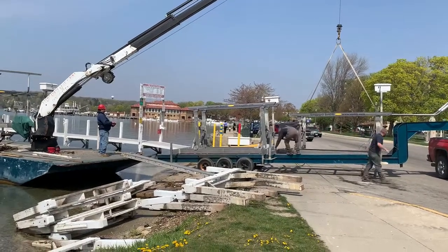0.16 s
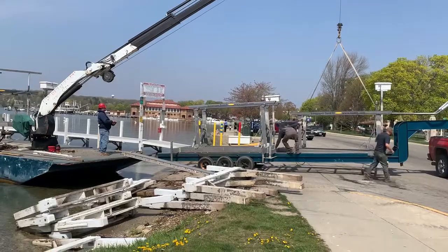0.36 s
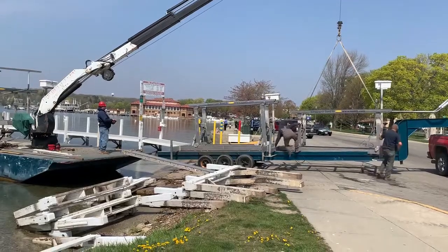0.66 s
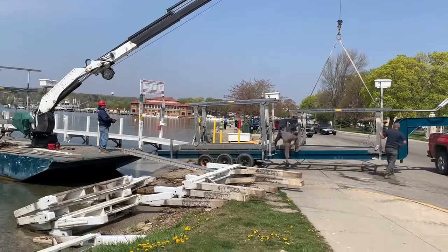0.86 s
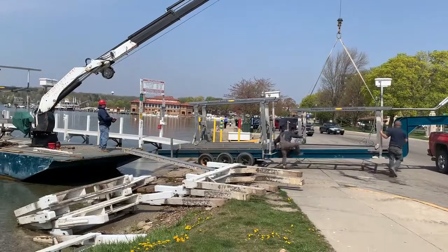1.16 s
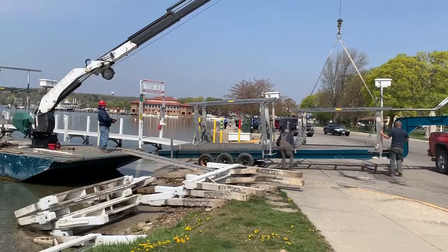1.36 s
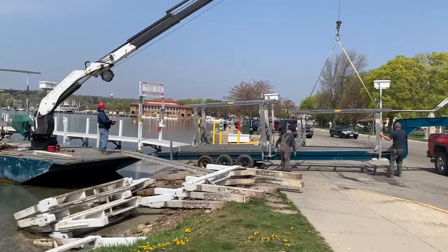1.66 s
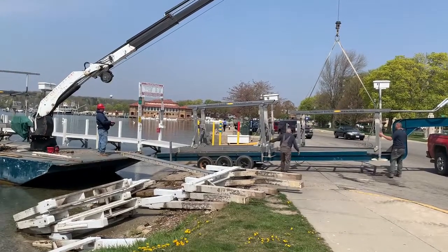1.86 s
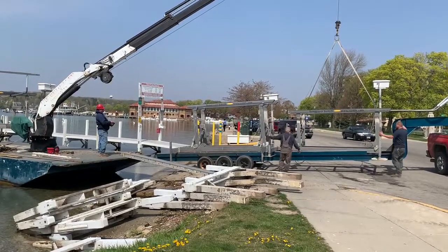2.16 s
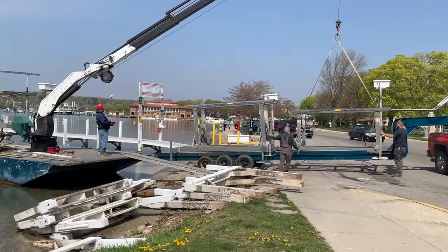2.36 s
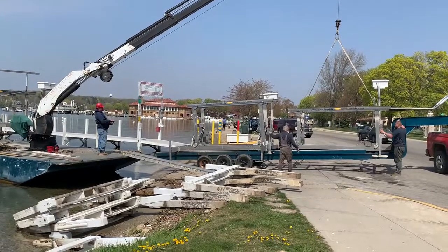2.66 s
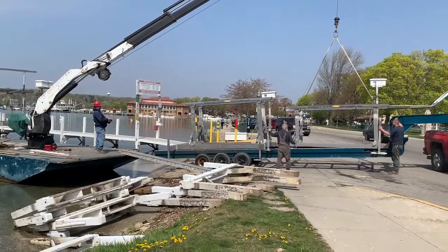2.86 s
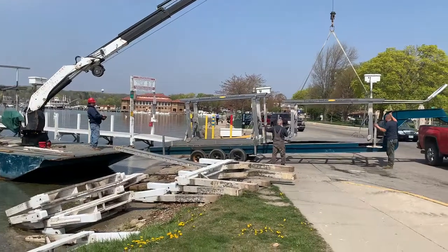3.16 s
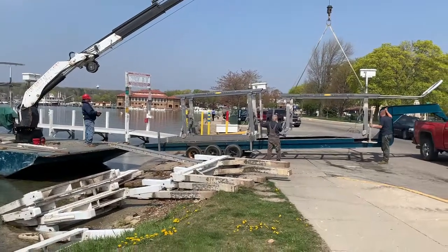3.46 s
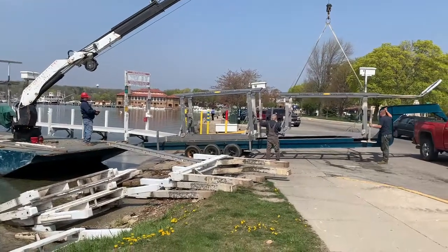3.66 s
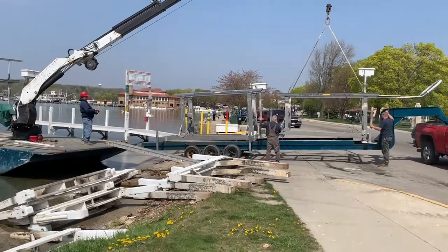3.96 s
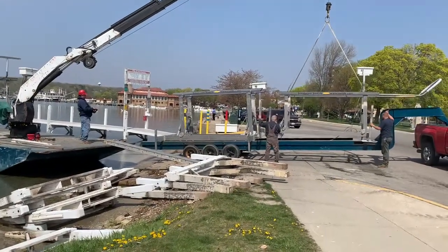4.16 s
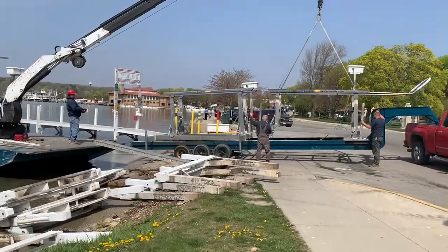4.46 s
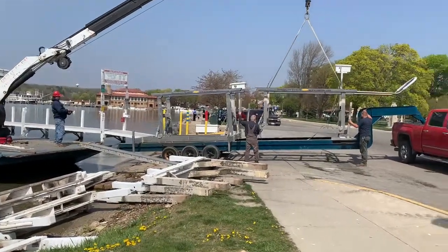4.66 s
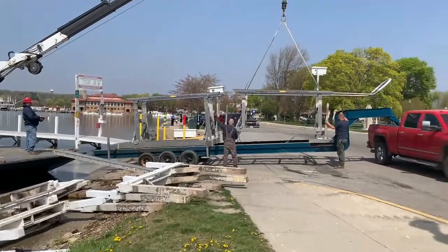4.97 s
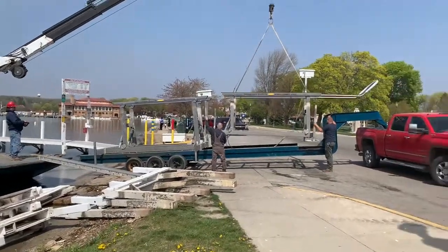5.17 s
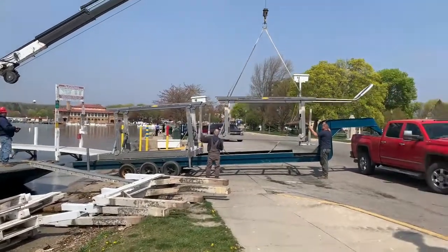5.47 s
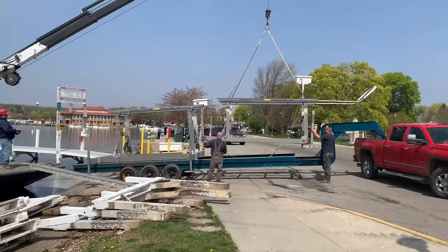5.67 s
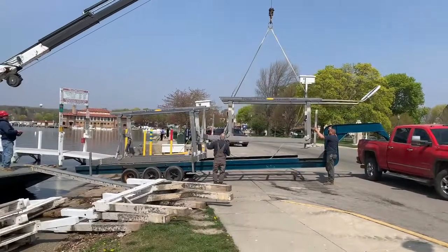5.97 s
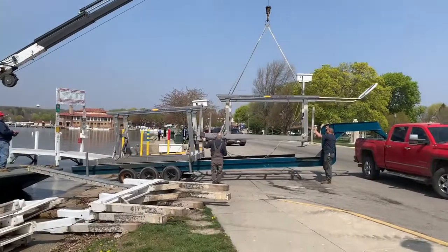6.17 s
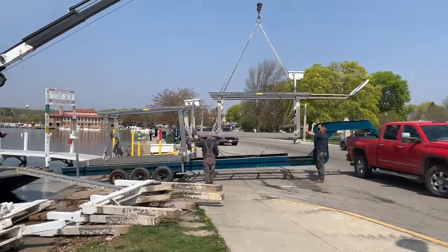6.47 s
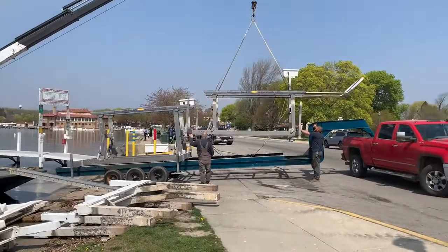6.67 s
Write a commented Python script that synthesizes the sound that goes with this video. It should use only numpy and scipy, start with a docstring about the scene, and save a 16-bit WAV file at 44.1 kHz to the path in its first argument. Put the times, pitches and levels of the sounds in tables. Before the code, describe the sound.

A continuous mechanical hum, throbbing roar and steady pitched pump whine fill an open lakeside ramp, with another engine idling softly behind. Small scuffs give way to a metal frame clunking and rattling, then isolated light clinks. Toward the end low rolling noise and soft thumps swell, a brief hiss passes, and gusts buffet the stereo microphone over a faint rustle.

```python
"""Barge crane at a lakefront

A crane lifts a metal frame: its diesel drones from the left and drives a piston pump that whines with the load,
both as sums of harmonics over a throbbing noise; a second engine idles nearby as wavering hum lines.
The frame clinks as summed modes and clunks as noise bursts; boot scuffs and a late rustle are noise bursts.
A pickup draws near on the right as rising bands of noise with ringing thumps, amid a swell of air hiss.
Late on the microphone turns away from the crane and wind buffets it with gusts of low noise and thuds."""
import sys
import numpy as np
from scipy import signal
from scipy.fft import rfft, irfft, next_fast_len
from scipy.io import wavfile

SR = 44100
rng = np.random.default_rng(int(sys.argv[2]) if len(sys.argv) > 2 else 0)


def wav_out(sig):
    """Save sig, one row per channel (or a flat mono array), as 16-bit PCM at SR to the path in sys.argv[1]."""
    wavfile.write(sys.argv[1], SR, np.round(np.clip(np.atleast_2d(sig).T, -1, 1) * 32767).astype(np.int16))


N = 301203
SIDES = np.array([[.5], [-.5]])   # shares a left-right difference between left and right

# Columns named pan_db give left minus right; lead_rad is the phase by which left leads.
# Piston rate of the pump, sagging under load: start_s, rate_hz
PISTON_RATE = [(0, 265.3), (.3, 266), (.7, 264.8), (.9, 266.2), (1.3, 267), (1.7, 265.7), (2.1, 264.2),
               (2.4, 263.9), (3.7, 265), (4.3, 264.2), (4.9, 264.8), (6.83, 264.8)]
# Engine orders: multiple_of_shaft_rate, mean_rms_db
ENGINE_ORDERS = [(3, -59.5), (5, -51), (6, -46.5), (7, -46), (8, -45.5), (9, -53.5), (11, -49.5),
                 (12, -52.5), (13, -49.5), (15, -54), (16, -49.5), (17, -61.5), (18, -56), (20, -59),
                 (29, -57.5)]
# Levels of the two lowest tones, with a short wind thud in the hum near 6.5 s:
# start_s, low_hum_rms_db, first_pump_harmonic_rms_db
LOW_TONE_LEVELS = [(0, -37, -39), (.2, -27, -45), (.55, -35, -52), (.75, -36, -37.5), (.9, -31, -40),
                   (1.25, -30.5, -40.5), (1.6, -30.5, -54), (2.0, -32, -48), (2.2, -34.5, -36.5),
                   (3.3, -31, -37), (3.6, -31.5, -49.5), (4.3, -35, -37), (5.1, -36, -38.5),
                   (5.7, -33.5, -36.5), (6.05, -39, -30.5), (6.3, -36, -43), (6.52, -19.5, -30),
                   (6.65, -34, -29.5), (6.83, -33, -32)]
# Whine swelling with the load: start_s, second_harmonic_rms_db, third_harmonic_rms_db
WHINE_LEVELS = [(0.0, -51, -56), (0.04, -37, -60), (0.05, -35.5, -49.5), (0.44, -37.5, -47),
                (0.55, -37, -41), (0.86, -35, -40), (0.91, -41, -42), (1.0, -46, -53), (1.05, -38, -51),
                (1.12, -41.5, -51), (1.2, -41, -50.5), (1.41, -39, -51), (1.81, -36, -47),
                (2.04, -33.5, -34.5), (2.2, -31, -36.5), (3.19, -31.5, -38), (3.25, -28, -40),
                (3.31, -32, -39), (3.65, -33.5, -36), (4.19, -32.5, -36.5), (4.7, -32.5, -40),
                (5.04, -29.5, -34), (5.14, -31, -37), (5.4, -33, -34), (5.46, -32.5, -33.5),
                (5.85, -37.5, -35), (6.1, -32.5, -35), (6.5, -31.5, -34), (6.83, -36.5, -34)]
# Place of the first pump harmonic: pan_db, lead_rad
FIRST_HARMONIC_PLACE = (-1.3, 0.17)
# Wandering place of the whine: start_s, second_pan_db, second_lead_rad, third_pan_db, third_lead_rad,
# upper_lead_rad
WHINE_PLACES = [(0, 3.4, 0.82, 5, 0.5, .8), (.4, 11.4, 0.69, 4, 0, 0.68), (.85, 6.6, 1.6, 0.5, 0, .8),
                (1.1, 3.2, .1, 11, -1, .8), (1.6, 7.2, 0.45, 10, 0.2, 0.66),
                (2.0, 5.1, 0.95, 2.5, -1.14, 0.87), (3.2, 4.8, 1.04, 0.5, 1, 0.75),
                (3.8, 4.3, 1.7, 1, 0.4, 2.3), (4.4, 4.7, 0.74, 1, 0.65, 1.5), (5.3, 4.4, 1.9, 2, 1.2, 3.9),
                (5.85, 13.5, 0.36, 5, 1.0, 4.1), (6.1, 5.5, 2.47, 1, 1.5, 4.5),
                (6.83, 4.7, 3.2, 3, 2.5, 2.6)]
# Flutter spread of pump harmonics 1 to 3: spread_db
PUMP_FLUTTER = [2, 0.64, 0.23]
# Upper pump harmonics: multiple_of_piston_rate, db_over_mean_of_harmonics_2_and_3
UPPER_HARMONICS = [(4, -15), (5, -16), (7, -23), (9, -28), (10, -23.5), (11, -25)]
# Hum lines of a second engine idling nearby: pitch_hz, mean_rms_db
IDLE_LINES = [(60.5, -48), (105.5, -44.5), (133, -46), (160, -42)]
# Crane roar: frequency_hz, relative_db_per_hz
ROAR_SPECTRUM = [(20, -41), (35, -24), (62, 2.5), (90, -9), (160, -6.5), (200, -11), (300, -16),
                 (450, -18.5), (900, -18.5), (1300, -18), (2100, -24), (2650, -24), (3200, -30),
                 (6700, -48), (8400, -69)]
# Likeness of the roar on both sides: frequency_hz, shared_power_share
ROAR_LIKENESS = [(60, 0.57), (300, 0.81), (1200, 0.43), (2700, 0.69), (5000, 0.34), (9000, 0.2)]
# Clinks of the frame: start_s, peak_db, contact_from_hz, contact_to_hz, share_of_free_ring_time
FRAME_CLINKS = [(3.214, -20.5, 600, 690, 1), (3.224, -20, 240, 310, .7), (3.232, -23, 770, 900, .6),
                (3.252, -26, 620, 780, 1), (3.288, -23, 240, 310, 1), (3.308, -21, 310, 370, 1),
                (3.236, -30, 2100, 2450, 1.2), (3.256, -30, 1550, 2050, 1), (3.276, -30, 1500, 1700, .8),
                (3.468, -25, 670, 780, .4), (3.857, -42, 6000, 12000, 1), (4.0055, -27, 1200, 1700, .45),
                (4.551, -31, 1600, 4000, 1), (4.9667, -31, 3950, 4650, .45), (4.967, -39, 6200, 13000, 1),
                (4.9675, -31, 3300, 3700, 1), (4.968, -32, 2500, 2750, .7), (4.969, -29, 1900, 2060, .5),
                (4.987, -33, 2200, 2400, .4), (4.989, -26, 1700, 1860, .8), (5.710, -38, 6000, 14000, 1),
                (6.1255, -31, 5200, 5700, .45), (6.125, -25, 1700, 2080, .7), (6.128, -30, 4150, 4450, 1.2),
                (6.130, -25, 2150, 2700, 1.5), (6.145, -34, 3800, 4800, .8), (6.152, -33, 1200, 1700, .8)]
# Modes of the free frame: pitch_hz, relative_db, free_t60_s
FRAME_MODES = [(280, 0, .15), (335, 0, .15), (655, 0, .2), (725, -2, .15), (820, -2, .15), (1300, -2, .05),
               (1450, -5, .05), (1620, -2, .05), (1780, -1, .06), (1980, 0, .05), (2300, 0, .05),
               (2620, -3, .03), (3500, -2, .025), (4100, -3, .025), (4300, -2, .035), (4600, -3, .025),
               (5450, -3, .03), (6400, -8, .02), (7300, -8, .02), (10800, -10, .02), (12300, -16, .015)]
# Clunk of the frame, then two as it rocks back: start_s, level_db, tilt_db_per_octave, pan_db
# (the tilt acts on the distance from the second clunk band, up or down)
FRAME_CLUNKS = [(3.205, -22, -0.65, 0), (3.47, -37, -10, -11.5), (3.74, -36, -7, -11)]
# Bands of each clunk: from_hz, to_hz, relative_db, lag_s, rise_s, t60_s
CLUNK_BANDS = [(245, 465, -11, 0.0068, 0.016, 1.0), (487, 890, -7, 0.011, 0.014, 0.5),
               (740, 1270, -7.5, 0.039, 0.0081, .4), (1070, 2100, -16, 0.01, 0.015, 0.65),
               (3200, 7700, -17.5, 0.0074, 0.021, 0.45), (9000, 11400, -20.5, 0.016, 0.0067, 0.25)]
# A low moan at the start, boot scuffs, faint ticks and, near 6.4 s, a broad rustle in the gusts:
# start_s, level_db, rise_s, t60_s, from_hz, to_hz
SCUFFS_AND_RUSTLE = [(.1, -33, 0.12, 2.4, 175, 240), (0.317, -59, 0.0073, 0.37, 8900, 16000),
                     (0.413, -50, .005, 0.16, 4960, 13000), (.54, -56, .011, 0.12, 9000, 16000),
                     (1.045, -39, 0.013, 0.11, 2500, 6760), (1.085, -57, .01, 0.12, 9500, 16000),
                     (1.362, -34, 0.003, .05, 1100, 2200), (1.427, -38, 0.003, .06, 1500, 4700),
                     (1.42, -40, 0.012, 0.32, 1300, 5000), (1.443, -40, 0.004, 0.12, 1600, 3300),
                     (1.505, -41, 0.004, 0.08, 1000, 3400), (1.05, -40, .004, 0.08, 1400, 1850),
                     (1.585, -56, 0.0041, 0.049, 8500, 13000), (1.815, -57, .008, .1, 9000, 15500),
                     (2.2, -50, .01, 0.13, 4000, 8950), (6.36, -34, 0.046, 0.67, 1100, 2600),
                     (6.48, -41, 0.05, 0.76, 1100, 2600)]
# Grit noise behind these bursts and the clunks: frequency_hz, relative_db_per_hz
GRIT_SPECTRUM = [(150, 34), (1000, -9), (16000, -40)]
# Broad noise of the pickup: frequency_hz, relative_db_per_hz
PICKUP_SPECTRUM = [(1000, 9), (1300, 3), (1600, -14.5), (2100, -1.5), (2400, 7), (2640, 7.5), (2950, -3),
                   (3700, -6), (4500, -1), (5400, -8), (7000, -12), (8400, -33)]
# Rumble of the pickup: frequency_hz, relative_db_per_hz
RUMBLE_SPECTRUM = [(200, -3), (290, -5), (400, -8.5), (600, -10.5), (950, -9.5), (1200, -10.5), (1600, -55)]
# Low thumps of the pickup, the last a wind thud: start_s, level_db, pitch_hz, t60_s
LOW_THUMPS = [(5.099, -20.5, 150, 0.13), (5.331, -18, 968, 0.051), (5.56, -15.5, 287, 0.13),
              (5.679, -17.5, 136, 0.29), (5.885, -18, 280, .1), (5.935, -17, 298, 0.12),
              (6.51, -18, 105, 0.25)]
# Air hiss: frequency_hz, relative_db_per_hz
HISS_SPECTRUM = [(5000, -3.5), (7500, 5.5), (10200, -0.5), (11800, -10.5), (14500, -0.5), (16000, -31)]
# Wind noise: frequency_hz, relative_db_per_hz
WIND_SPECTRUM = [(25, -24), (50, -13), (75, -9.5), (115, -7.5), (180, -14.5), (300, -25)]
# Gusts on the microphone: centre_s, top_db, half_width_s (to 1/e of the top amplitude)
WIND_GUSTS = [(.15, -39, 0.17), (.7, -41.5, 0.53), (5.5, -33, 0.49), (6.4, -28, 0.037), (6.52, -33, 0.019),
              (6.45, -24.5, 0.48), (6.72, -31.5, 0.062)]
# Treble colour of the whole sound: frequency_hz, gain_db
TREBLE_COLOUR = [(7600, -0.5), (8300, 6), (8750, -13), (9300, 0.5), (12300, 7), (13300, -13.5), (14300, 11)]
# Bass swing of the stereo image: frequency_hz, added_lead_rad
BASS_SWING = [(40, .6), (90, 1.0), (125, 1.8), (185, 2.6), (220, 3.4), (260, 4.8), (330, 2 * np.pi)]

# Crane
PULSES_PER_TURN, FIRINGS_PER_TURN = 14, 4
HUM_WAVER_DB, UPPER_FLUTTER_DB = 0.7, 2.8
IDLE_WAVER_DB, IDLE_WANDER_TURNS = 2, 0.16
SIDE_LINE_HZ, SIDE_LINE_DB = 1274, -53.5   # thin wavering tone just under the 5th pump harmonic
ROAR_DB, ROAR_DB_PER_LOAD_DB = -30.5, 0.22   # level at full load before the turn
TURN_FROM_S, TURN_TO_S = 4.65, 9.8   # the microphone's turn is still under way at the end
ROAR_TURN_DB, TURN_FLUTTER_DB = 7, 1   # added to roar and whine flutter by a whole turn
# Frame and boots
CONTACT_S, RATTLE_DEPTH, RATTLE_HZ = .002, .12, 300
CLATTER_DB, CLATTER_HZ = 2.5, 80   # uneven grains of the bursts above the bass
SCUFF_PAN_DB = -6.5
# Pickup: draws near at a steady dB rate, then stays
ARRIVE_S = 5.58
PICKUP_DB, PICKUP_FAR_DB, PICKUP_DB_PER_S = -42, -66.5, 9.5
RUMBLE_DB, RUMBLE_FAR_DB, RUMBLE_DB_PER_S = -27.5, -44, 10.5
LUMPS_DB, LUMPS_HZ = 3, 14.4
DRONE_HZ, DRONE_WIDTH_HZ, DRONE_DB = 287, 20, -12   # level relative to the rumble
DRONE_SURGE_DB, DRONE_FADE_FROM_S, DRONE_FADE_DB_PER_S = 3.0, 5.83, 37
THUMP_RISE_S = .008
# Background and microphone
HISS_TOP_S, HISS_DB, HISS_FAR_DB = 5.37, -47.5, -67
HISS_RISE_DB_PER_S, HISS_FALL_DB_PER_S = 18.5, 20
BREEZE_DB = -55.5
SWING_FROM_S, SWING_TAKES_S = 5.3, 0.0099
CUTOFF_HZ = 16200


def from_db(db):
    """Level: a gain is ten to the power of dB over 20."""
    return 10 ** (np.asarray(db) / 20)


def power_sum(*levels_db):
    """Incoherent addition: the powers of unrelated parts add."""
    return 10 * np.log10(sum(from_db(db) ** 2 for db in levels_db))


def rms_one(x):
    """Normalisation: a signal is divided by its root mean square."""
    return x / np.sqrt(np.mean(x ** 2) + 1e-20)


def in_time(rows):
    """Linear interpolation: each column of a time table becomes one value a sample."""
    seconds, *columns = np.transpose(rows)
    return [np.interp(np.arange(N) / SR, seconds, column) for column in columns]


def at_hz(points, hz):
    """Logarithmic interpolation: a frequency table is read on a log-frequency axis."""
    table = np.array(points)
    return np.interp(np.log(hz), np.log(table[:, 0]), table[:, 1])


def drift(rate_hz):
    """Random modulation: noise through a double low-pass pole wanders slowly with spread 1."""
    step = 40   # samples between drawn values
    pole = np.exp(-2 * np.pi * rate_hz * step / SR)
    draws = rng.standard_normal(N // step + 2002)
    slow = signal.lfilter([1], [1, -2 * pole, pole * pole], draws)[2000:]   # settled part
    return np.interp(np.arange(N) / step, np.arange(len(slow)), rms_one(slow))


def tone(turns, db, pan_db, lead_rad):
    """Sinusoid: phase in turns gives a sine of the given rms level, placed by level and phase."""
    gain = np.sqrt(2) * from_db(db + pan_db * SIDES)
    phase = 2 * np.pi * (turns + rng.random())
    return gain * np.sin(phase + lead_rad * SIDES)


def noise(spectrum, alike, lead_ms, patchy_db):
    """Partial coherence: shared and separate noise make a stereo field whose half-octave bands flicker."""
    size = next_fast_len(N)
    hz = np.maximum(np.arange(size // 2 + 1) * SR / size, 1)
    shared, left, right = rfft(rng.standard_normal((3, size)))
    likeness = np.clip(alike(hz), 0, 1)
    early = np.exp(1j * np.pi * hz * lead_ms / 1000)   # half the lead on each side
    pair = np.sqrt(likeness) * shared * [early, 1 / early]
    pair += np.sqrt(1 - likeness) * np.array([left, right])
    low_hz, high_hz = spectrum[0][0], spectrum[-1][0]
    pair *= from_db(at_hz(spectrum, hz)) * (hz >= low_hz) * (hz <= high_hz)
    half_octaves = 2 * np.log2(hz / low_hz)
    together = drift(2.5)
    out = 0
    for k in range(int(2 * np.log2(high_hz / low_hz)) + 2):
        band = irfft(pair * np.clip(1 - abs(half_octaves - k), 0, 1), size)[:, :N]
        out = out + band * from_db(patchy_db * (.5 * together + drift(12.0)))
    return rms_one(out)


def diesel(shaft, hum_db):
    """Harmonic series: low hum at the firing rate and other shaft orders follow one rotation."""
    out = tone(FIRINGS_PER_TURN * shaft, hum_db + HUM_WAVER_DB * drift(16.0), -0.11, 0.11)
    for order, db in ENGINE_ORDERS:
        out += tone(order * shaft, db + 0.44 * drift(4.0), -1.8, 0.68)
    return out


def pump(pulses, first_db, second_db, third_db, turn):
    """Periodic flow pulses: harmonics of the piston rate swell with the load."""
    second_pan_db, second_lead, third_pan_db, third_lead, upper_lead = in_time(WHINE_PLACES)
    places = [FIRST_HARMONIC_PLACE, (second_pan_db, second_lead), (third_pan_db, third_lead)]
    out = 0
    for k, (db, (pan_db, lead)) in enumerate(zip([first_db, second_db, third_db], places)):
        flutter_db = PUMP_FLUTTER[k] + TURN_FLUTTER_DB * turn * (k > 0)
        out = out + tone((k + 1) * pulses, db + flutter_db * drift(4.8), pan_db, lead)
    whine_db = (second_db + third_db) / 2
    for k, db in UPPER_HARMONICS:   # these flutter quickly at random
        flutter_db = UPPER_FLUTTER_DB * drift(26.0)
        out += tone(k * pulses + 0.25 * drift(1.65), whine_db + db + flutter_db, 2.0, upper_lead)
    side_turns = SIDE_LINE_HZ * np.arange(N) / SR + 0.47 * drift(2.7)
    return out + tone(side_turns, SIDE_LINE_DB + 2.0 * drift(4.4), 2.5, 0.76)


def crane_roar(shaft, pulses, load_db, turn):
    """Amplitude modulation: broadband roar throbs with each shaft turn and pump pulse."""
    throb_db = 0.12 * np.sin(2 * np.pi * shaft) + 0.5 * np.sin(2 * np.pi * pulses)
    level_db = ROAR_DB + ROAR_TURN_DB * turn + ROAR_DB_PER_LOAD_DB * load_db + throb_db
    roar = noise(ROAR_SPECTRUM, lambda hz: at_hz(ROAR_LIKENESS, hz), lead_ms=.28, patchy_db=1.1)
    return roar * from_db(level_db - 1.6 * SIDES)


def crane(turn):
    """Common drive: integrating one piston rate gives the phase of diesel, pump and throbbing roar."""
    pulses = np.cumsum(in_time(PISTON_RATE)[0]) / SR
    shaft = pulses / PULSES_PER_TURN
    hum_db, first_db = in_time(LOW_TONE_LEVELS)
    second_db, third_db = in_time(WHINE_LEVELS)
    load_db = second_db - second_db.max()
    out = diesel(shaft, hum_db) + pump(pulses, first_db, second_db, third_db, turn)
    return out + crane_roar(shaft, pulses, load_db, turn)


def clinks():
    """Modal excitation: each contact rings the frame modes in and near its own band."""
    out = np.zeros(N)
    strengths_db = rng.normal(0, 1.5, (len(FRAME_CLINKS), len(FRAME_MODES)))
    t = np.arange(SR // 8) / SR
    pole = np.exp(-2 * np.pi * RATTLE_HZ / SR)
    rattle = rms_one(signal.lfilter([1], [1, -pole], rng.standard_normal(len(t))))
    for (s, db, low_hz, high_hz, share), own_db in zip(FRAME_CLINKS, strengths_db):
        ring = np.zeros(len(t))
        for (hz, mode_db, t60), extra_db in zip(FRAME_MODES, own_db):
            mode = from_db(mode_db + extra_db - 60 * t / (share * t60)) * np.sin(2 * np.pi * hz * t)
            ring += mode / (1 + (hz / high_hz) ** 24) / (1 + (low_hz / hz) ** 24)
        ring *= 1 + RATTLE_DEPTH * rattle       # loose joints smear the ring
        ring *= np.minimum(t / CONTACT_S, 1)    # the contact takes a moment
        i = round(s * SR)
        out[i:i + len(t)] += from_db(db) * ring / np.abs(ring).max()
    return np.array([out * from_db(-1.2), np.roll(out, -1) * from_db(1.2)])   # right one sample early


def clunk_bursts():
    """Spectral decomposition: each clunk is a set of band bursts with their own lag, rise and decay."""
    bursts = []
    for s, db, tilt_db, pan_db in FRAME_CLUNKS:
        for low_hz, high_hz, band_db, lag, rise, t60 in CLUNK_BANDS:
            octaves = abs(np.log2(low_hz / CLUNK_BANDS[1][0]))
            level_db = db + band_db + tilt_db * octaves
            bursts.append((s + lag, level_db, rise, t60, low_hz, high_hz, pan_db))
    return bursts


def noise_bursts():
    """Filtered noise: clunks, scuffs and rustle are band-passed grit that rises, then decays exponentially."""
    grit = noise(GRIT_SPECTRUM, lambda hz: .85 + 0 * hz, lead_ms=-.01, patchy_db=1.0)
    out = np.zeros((2, N))
    grains_db = CLATTER_DB * drift(CLATTER_HZ)
    bursts = [(*row, SCUFF_PAN_DB) for row in SCUFFS_AND_RUSTLE] + clunk_bursts()
    for s, db, rise, t60, low_hz, high_hz, pan_db in bursts:
        i = round(s * SR)
        t = np.arange(min(round(t60 * SR / 2), N - i)) / SR   # down to 30 dB of decay
        band = signal.butter(2, [low_hz, high_hz], "band", fs=SR, output="sos")
        burst = signal.sosfilt(np.vstack([band, band]), grit[:, i:i + len(t)])
        burst *= from_db(grains_db[i:i + len(t)] * (low_hz > 500))
        envelope = np.minimum(t / rise, 1) ** 2 * from_db(db + pan_db * SIDES - 60 * t / t60)
        out[:, i:i + len(t)] += rms_one(burst) * envelope
    return out


def pickup_rush(to_go_s):
    """Approach: broad noise, led by the right, rises at a steady dB rate out of a faint floor."""
    level_db = power_sum(PICKUP_DB - PICKUP_DB_PER_S * to_go_s, PICKUP_FAR_DB)
    rush = noise(PICKUP_SPECTRUM, lambda hz: .5 + 0 * hz, lead_ms=-.41, patchy_db=.7)
    return rush * from_db(level_db - 3 * SIDES)


def pickup_rumble(t, to_go_s):
    """Rolling noise and resonance: lumpy low noise also feeds a narrow resonant drone."""
    level_db = power_sum(RUMBLE_DB - RUMBLE_DB_PER_S * to_go_s, RUMBLE_FAR_DB)
    rumble = noise(RUMBLE_SPECTRUM, lambda hz: .9 + 0 * hz, lead_ms=-.41, patchy_db=1.2)
    # lumps as tyres meet rough ground
    rumble = rms_one(rumble * from_db(LUMPS_DB * drift(LUMPS_HZ)))
    resonance = signal.iirpeak(DRONE_HZ, DRONE_HZ / DRONE_WIDTH_HZ, SR)
    drone = rms_one(signal.lfilter(*resonance, rumble))
    fade_db = DRONE_FADE_DB_PER_S * np.maximum(t - DRONE_FADE_FROM_S, 0)
    drone_db = DRONE_DB + DRONE_SURGE_DB * drift(6.0) - fade_db
    return from_db(level_db) * (rumble + drone * from_db(drone_db))


def thumps():
    """Damped oscillation: soft blows ring briefly at one pitch, alike on both sides."""
    out = np.zeros(N + SR)
    t = np.arange(SR // 4) / SR
    for (s, db, hz, t60), start_turn in zip(LOW_THUMPS, rng.random(len(LOW_THUMPS))):
        i = round(s * SR)
        envelope = from_db(db - 60 * t / t60) * np.minimum(t / THUMP_RISE_S, 1)
        out[i:i + len(t)] += envelope * np.sin(2 * np.pi * (hz * t + start_turn))
    return out[:N]


def idling_engine(t):
    """Phase and amplitude modulation: steady hum lines waver in level and wander in phase."""
    out = np.zeros((2, N))
    for hz, db in IDLE_LINES:
        turns = hz * t + IDLE_WANDER_TURNS * drift(1.75)
        out += tone(turns, db + IDLE_WAVER_DB * drift(2.7), -1.5, 0.41)
    return out


def air_hiss(t):
    """Swelling noise: treble hiss rises and sinks at steady dB rates around its top."""
    swell_db = np.minimum(HISS_RISE_DB_PER_S * (t - HISS_TOP_S), HISS_FALL_DB_PER_S * (HISS_TOP_S - t))
    level_db = power_sum(HISS_DB + swell_db, HISS_FAR_DB)
    hiss = noise(HISS_SPECTRUM, lambda hz: 1.0 + 0 * hz, lead_ms=-0.1787, patchy_db=3.5)
    return from_db(level_db) * hiss


def wind(t):
    """Wind buffeting: Gaussian gusts over a steady breeze shape low noise."""
    gain = from_db(BREEZE_DB)
    for s, db, width in WIND_GUSTS:
        gain = gain + from_db(db) * np.exp(-((t - s) / width) ** 2)
    return gain * noise(WIND_SPECTRUM, lambda hz: .9 + 0 * hz, lead_ms=.1, patchy_db=2.5)


def scene():
    """Superposition: all sources add at the two microphone ports."""
    t = np.arange(N) / SR
    turn = np.clip((t - TURN_FROM_S) / (TURN_TO_S - TURN_FROM_S), 0, 1)
    to_go_s = np.maximum(ARRIVE_S - t, 0)
    foreground = crane(turn) + clinks() + noise_bursts()
    approach = pickup_rush(to_go_s) + pickup_rumble(t, to_go_s) + thumps()
    background = idling_engine(t) + air_hiss(t) + wind(t)
    return foreground + approach + background


def record(dry):
    """Linear filtering: treble colour, a bass image that swings wide once, then a steep top cut."""
    size = next_fast_len(N + SR // 4)
    hz = np.maximum(np.arange(size // 2 + 1) * SR / size, 1)
    coloured = rfft(dry, size) * from_db(at_hz(TREBLE_COLOUR, hz))
    left, right = irfft(coloured, size)[:, :N]
    late = irfft(coloured[1] * np.exp(-1j * at_hz(BASS_SWING, hz)), size)[:N]
    swung = np.clip((np.arange(N) / SR - SWING_FROM_S) / SWING_TAKES_S, 0, 1)
    pair = np.array([left, right + swung * (late - right)])
    top_cut = signal.cheby2(16, 70, CUTOFF_HZ, fs=SR, output="sos")   # 70 dB down from the cutoff up
    return signal.sosfilt(top_cut, pair)


dry = scene()
out = record(dry)
wav_out(out)
```